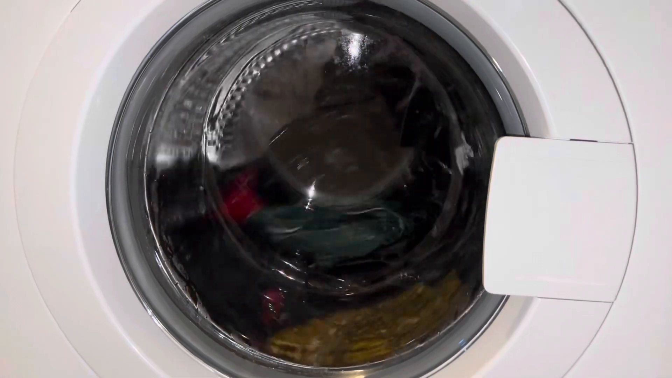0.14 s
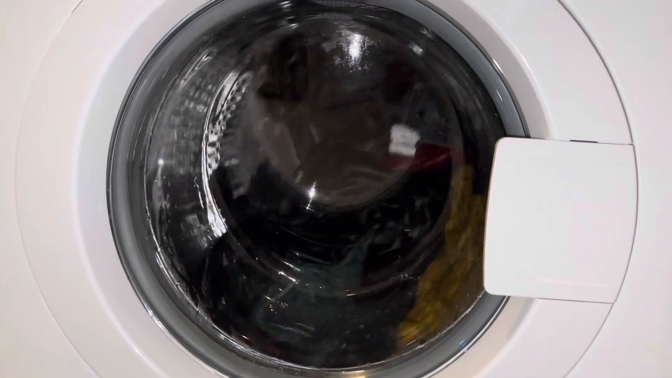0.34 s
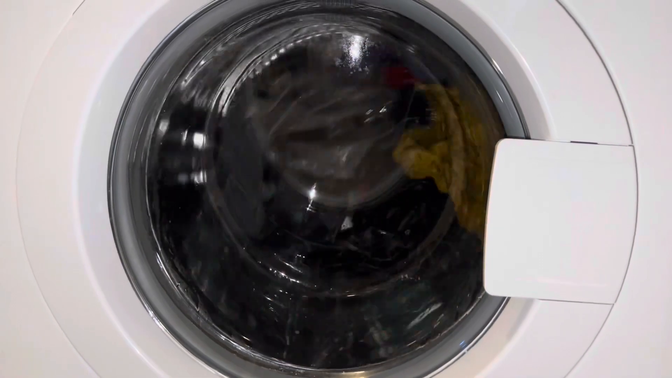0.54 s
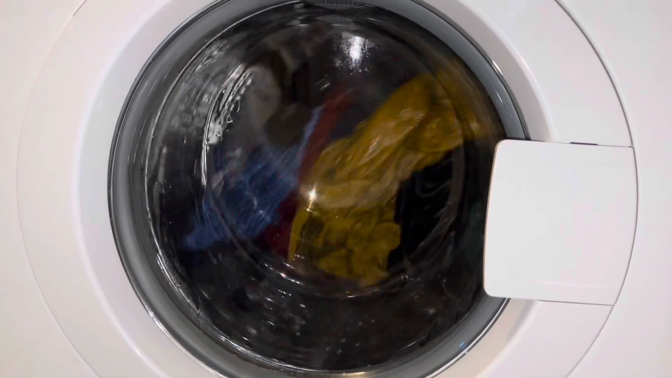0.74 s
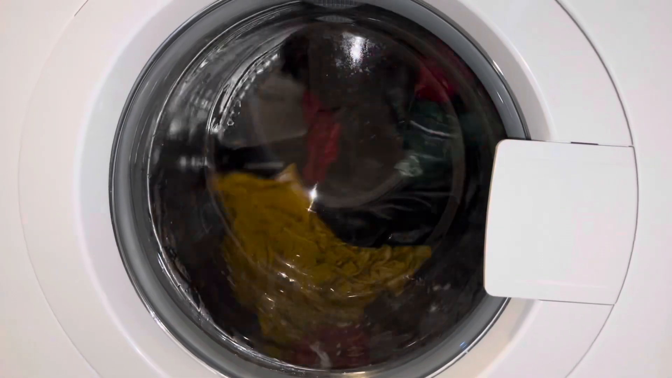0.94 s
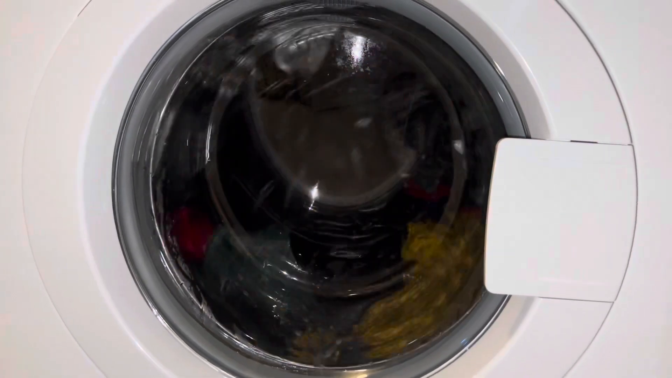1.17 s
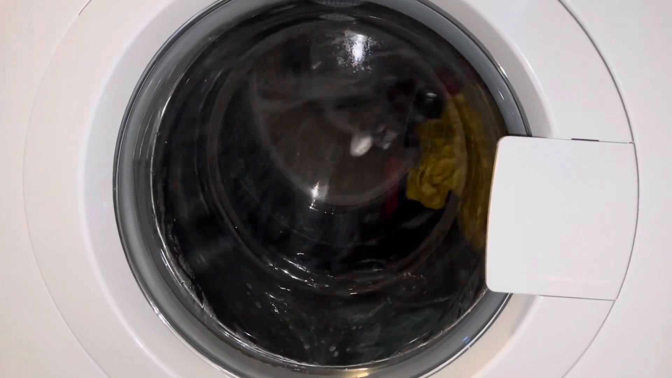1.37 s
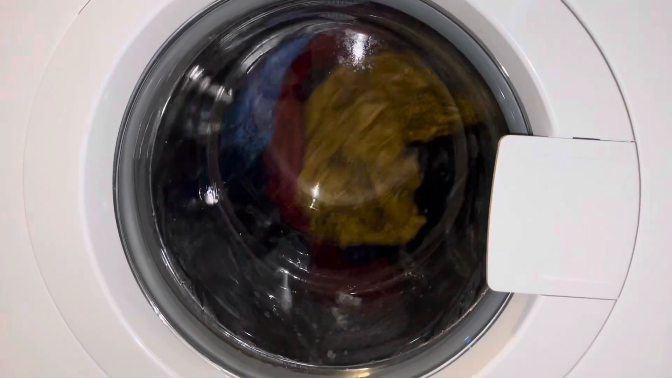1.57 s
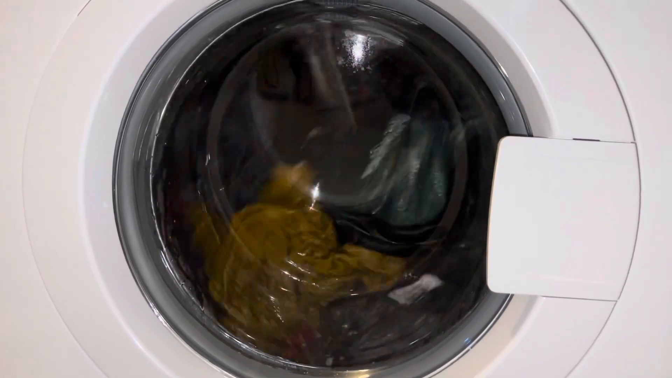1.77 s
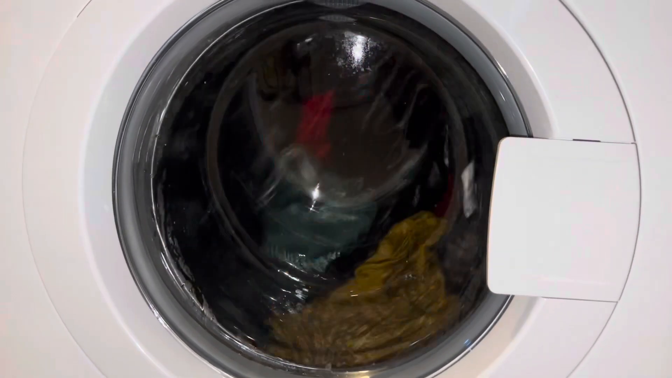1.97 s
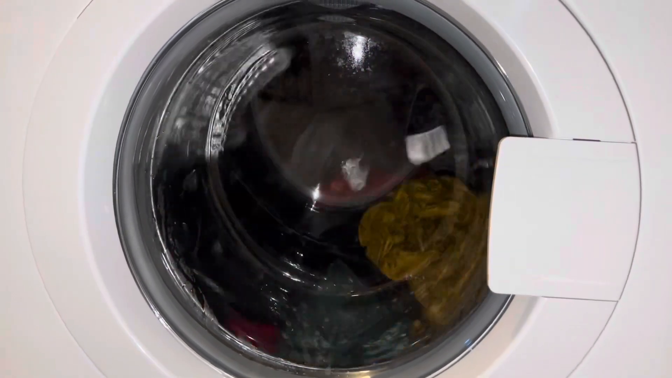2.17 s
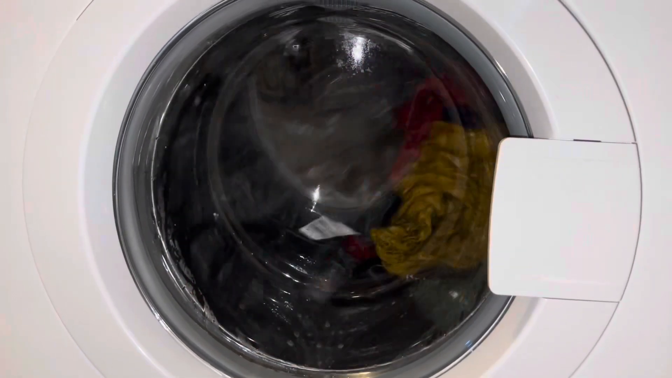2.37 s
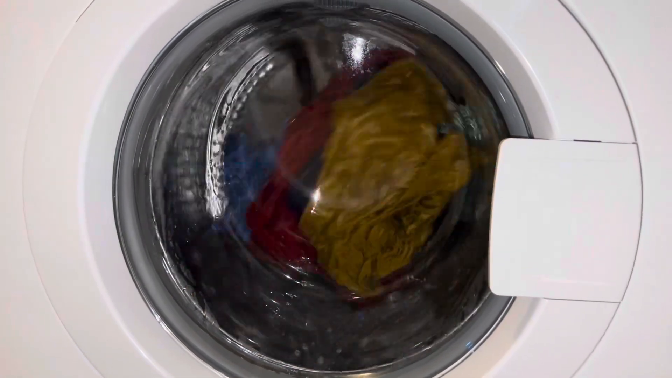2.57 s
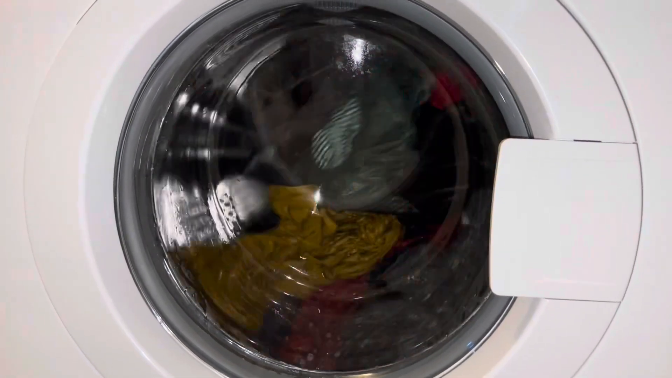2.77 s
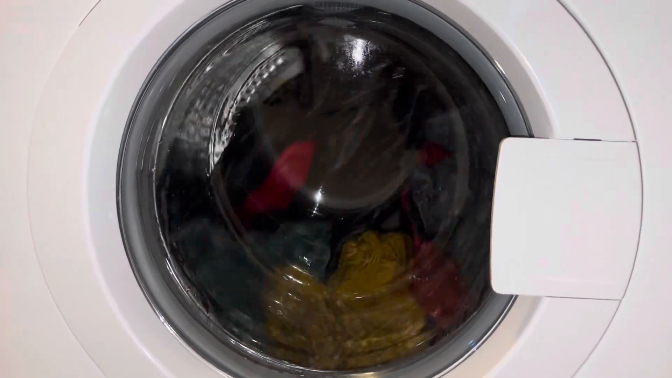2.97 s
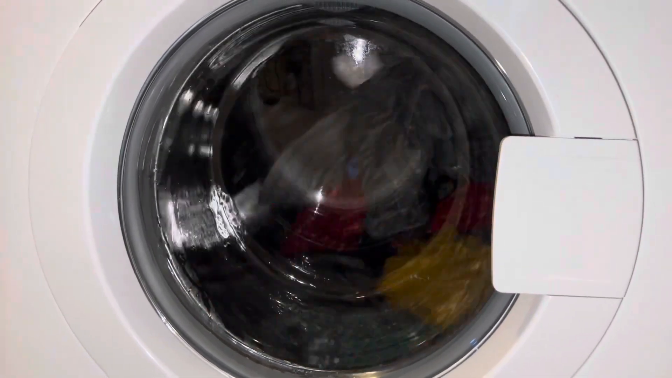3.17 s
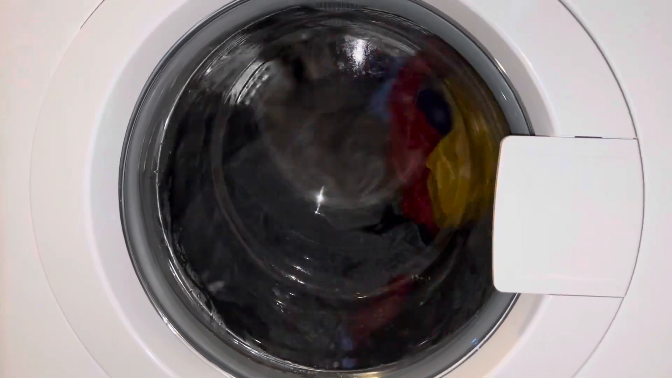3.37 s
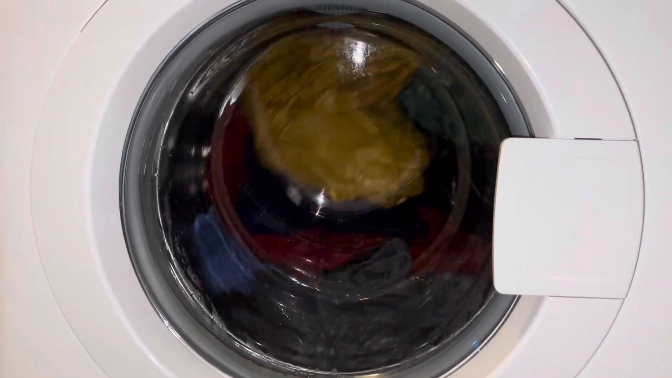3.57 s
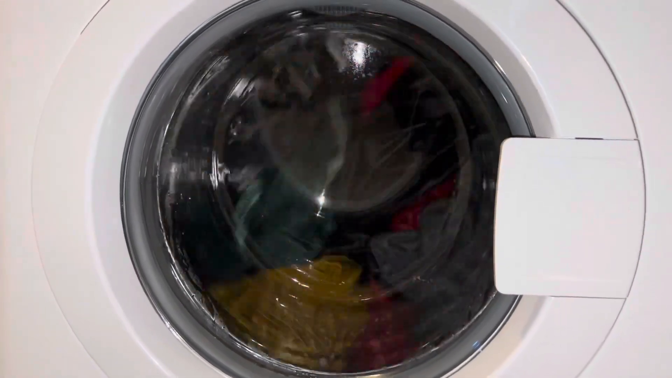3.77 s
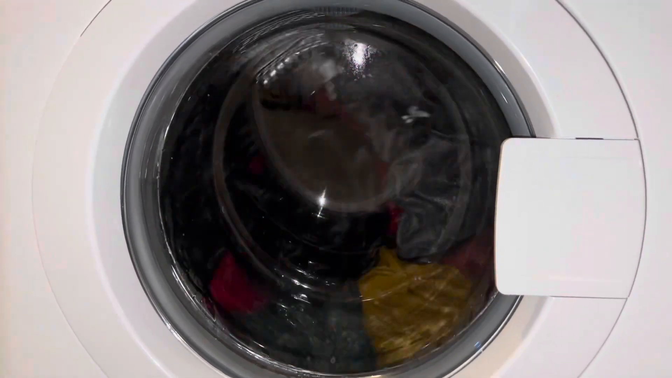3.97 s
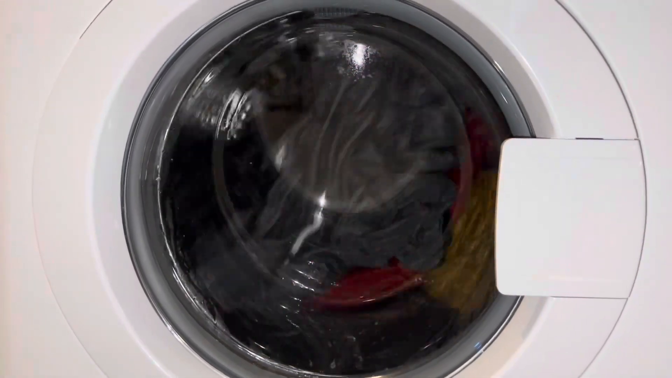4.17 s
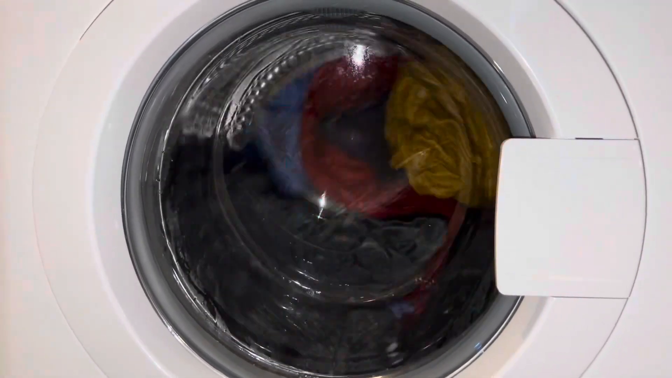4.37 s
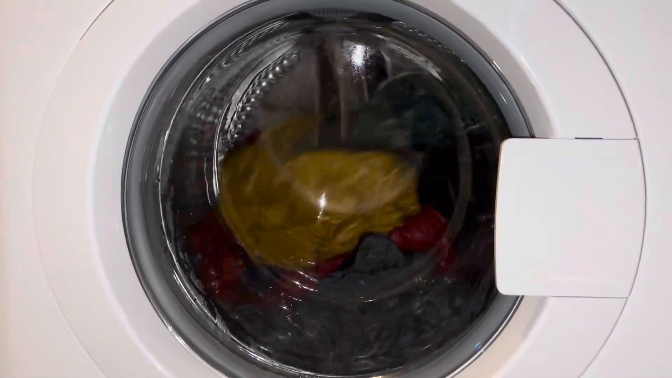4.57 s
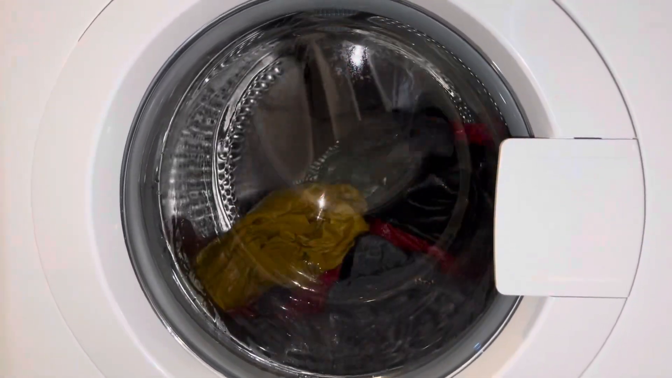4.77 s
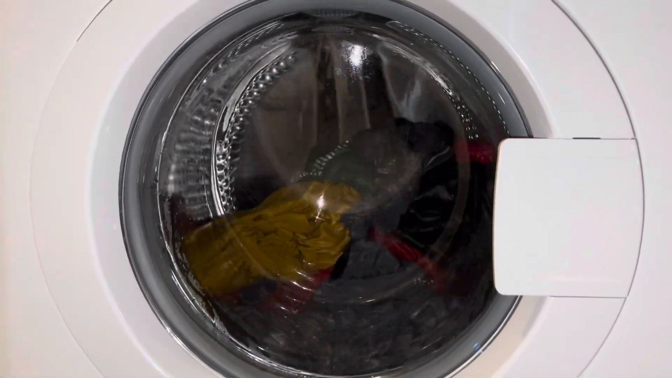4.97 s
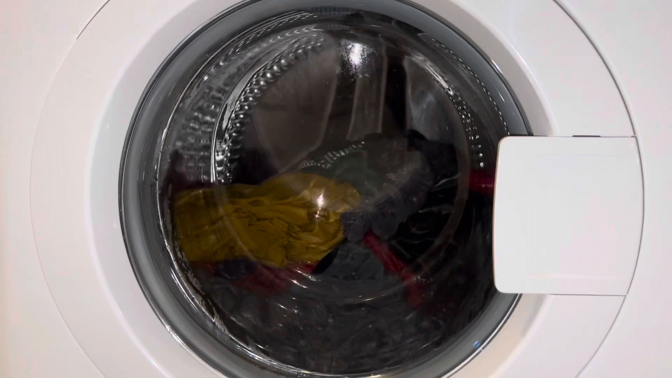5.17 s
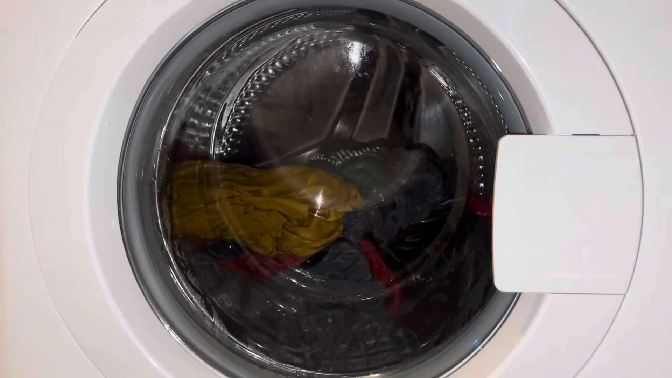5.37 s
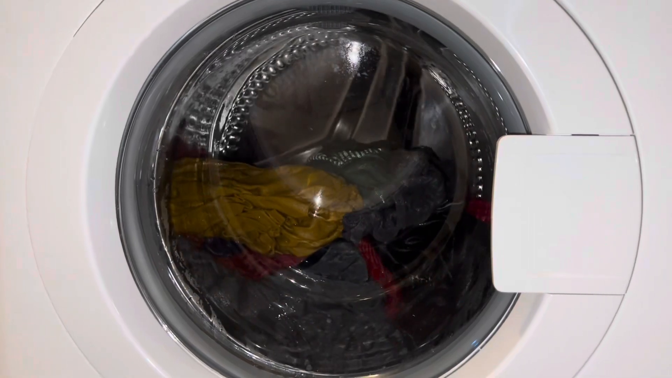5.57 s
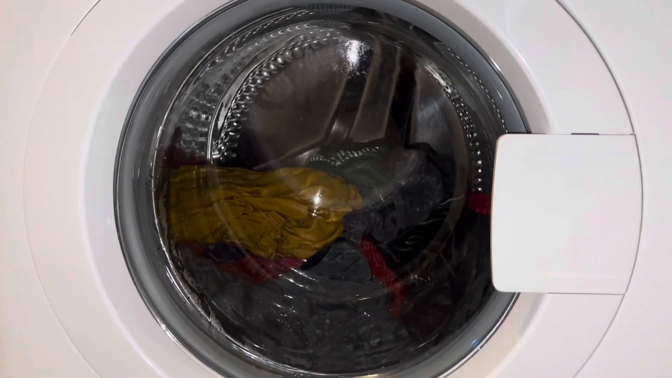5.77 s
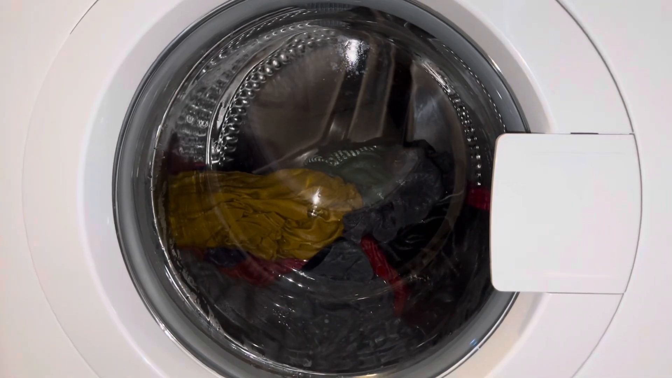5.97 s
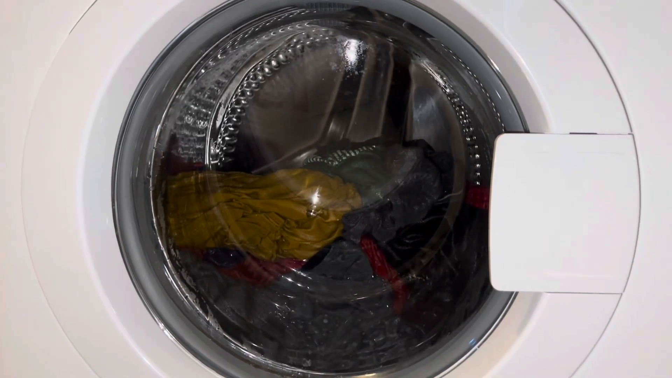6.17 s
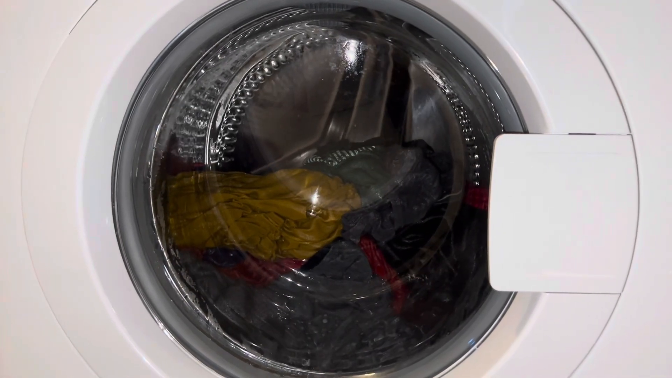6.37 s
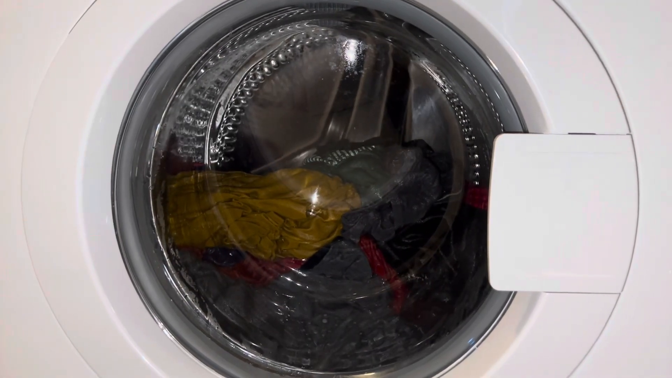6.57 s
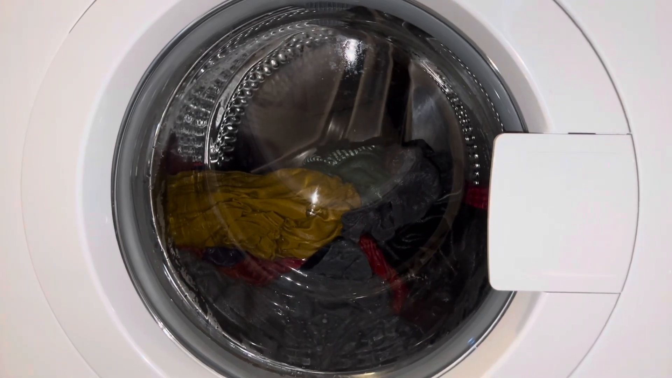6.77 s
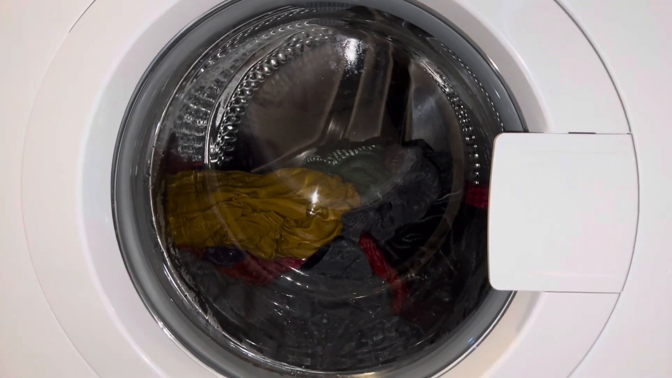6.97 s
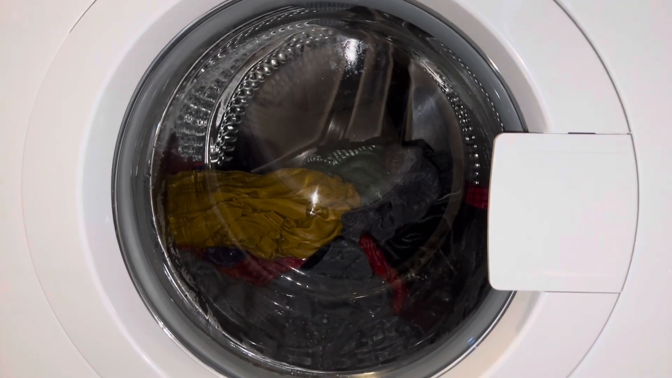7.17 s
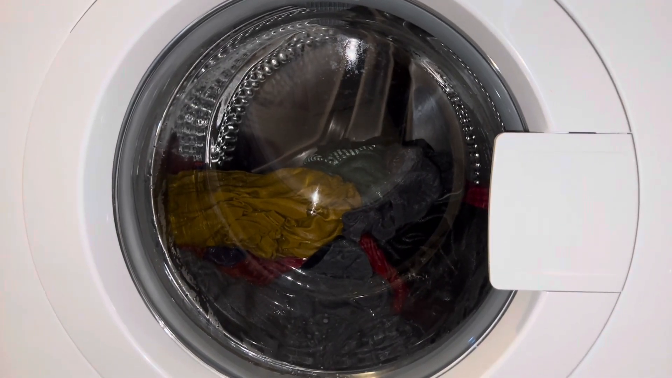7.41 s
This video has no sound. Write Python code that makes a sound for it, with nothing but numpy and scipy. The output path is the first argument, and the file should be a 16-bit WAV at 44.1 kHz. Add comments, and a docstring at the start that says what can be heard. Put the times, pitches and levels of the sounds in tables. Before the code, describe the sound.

Wet clothes tumble and splash in a humming washing machine drum; the motor cuts out, water trickles away, then a relay clacks in near silence.

```python
"""Washing machine coming to rest

A front-loading washing machine tumbles wet laundry in a small hard room.
Magnetic pull makes the mains-fed motor hum, its commutator whines; shaped noise and bubbles slap and slosh.
At 4.35 s the motor cuts out and the load flops to rest; water drains with a hiss and rising gurgles.
A relay then clacks and rings the cabinet panels over a faint steady hiss."""
import sys
import numpy as np
from scipy import signal
from scipy.fft import rfft, irfft, next_fast_len
from scipy.io import wavfile
from scipy.ndimage import uniform_filter1d

SR = 44100
rng = np.random.default_rng(int(sys.argv[2]) if len(sys.argv) > 2 else 0)


def transcribe(signal):
    """Save signal, clipped to [-1, 1], as a 16-bit WAV file at the path in sys.argv[1]."""
    frames = np.atleast_2d(signal).T
    limited = np.clip(frames, -1, 1)
    pcm = np.round(limited * 32767).astype(np.int16)
    wavfile.write(sys.argv[1], SR, pcm)


N = 328104
TIME = np.arange(N) / SR  # s
BUZZ_HZ = 99.93  # twice the mains frequency
MOTOR_OFF_S, DRUM_STOP_S = 4.35, 4.71
CUTOFF_HZ = 15800

# Motor hum under the changing load, before a common gain: start_s, second_line_db [200 Hz], first_line_db [100 Hz]
MOTOR_LOAD = [(0.0, -43, -53), (0.31, -32.5, -40), (0.47, -30.5, -41), (0.53, -34.5, -35),
              (0.94, -33.5, -42), (1.25, -31.5, -42), (1.34, -37, -41.5), (1.57, -35, -41),
              (1.75, -42, -48), (2.4, -34, -40.5), (2.51, -36, -48), (2.56, -39, -45), (3.12, -34, -40.5),
              (3.23, -35.5, -44.5), (3.76, -38, -42), (4.0, -34.5, -42), (4.28, -39, -41.5),
              (4.33, -39.5, -47)]
# Upper hum lines: multiple [of the buzz], level_db [re the 200 Hz line, before a common gain]
UPPER_HUM_LINES = [(3, -14.5), (4, -24.5)]


def hum():
    """Magnetostatic force: the pull at twice the mains shakes the cabinet, harder as the load is lifted."""
    second_db, first_db = in_time(MOTOR_LOAD)
    phase = 2 * np.pi * BUZZ_HZ * TIME
    first = from_db(first_db + 3.5) * np.cos(phase + 0.05 * drift(1.7))
    second = from_db(second_db + 3.5) * np.cos(2 * phase + 0.065 * drift(6.9))
    upper = np.zeros(N)
    for multiple, db in UPPER_HUM_LINES:
        gain = from_db(second_db + db + 2.0 + 2 * drift(5.6))
        upper += gain * np.cos(multiple * phase + 0.14 * drift(5.1))
    running = until(MOTOR_OFF_S + 0.014, 0.012)
    return (first * pan(-0.053) + (second + upper) * pan(-3.5)) * running


def load_swing():
    """Load modulation: how far the 200 Hz line stands above its mean while the motor runs, in dB."""
    load_db, _ = in_time(MOTOR_LOAD)
    return load_db - load_db[TIME < MOTOR_OFF_S].mean()


# Commutator rate, sagging as a bundle is lifted and racing as it drops: start_s, pitch_hz
COMMUTATOR_RATE = [(0, 1815), (0.07, 1740), (0.17, 1722), (0.3, 1761), (0.35, 1690), (0.41, 1730),
                   (0.48, 1703), (0.58, 1802), (0.65, 1737), (0.79, 1820), (0.84, 1743), (0.89, 1813),
                   (0.96, 1757), (1.0, 1795), (1.07, 1745), (1.11, 1714), (1.16, 1705), (1.25, 1770),
                   (1.34, 1760), (1.39, 1720), (1.45, 1672), (1.55, 1814), (1.61, 1840), (1.67, 1860),
                   (1.76, 1780), (1.83, 1808), (1.95, 1714), (2.01, 1800), (2.1, 1730), (2.19, 1804),
                   (2.3, 1690), (2.48, 1845), (2.55, 1870), (2.61, 1788), (2.68, 1835), (2.73, 1788),
                   (2.83, 1742), (2.9, 1662), (3.0, 1654), (3.17, 1869), (3.22, 1730), (3.29, 1765),
                   (3.37, 1685), (3.47, 1667), (3.59, 1714), (3.64, 1688), (3.72, 1825), (3.76, 1763),
                   (3.84, 1700), (4.02, 1813), (4.12, 1772), (4.18, 1827), (4.23, 1816), (4.33, 1892)]
# Commutator tones: multiple [of the rate], level_db, strongest_sideband [order], sideband_loss_db [per order]
COMMUTATOR_TONES = [(1, 0.5, 0.82, 5.5), (1.5, -3, -0.25, 0.35), (2, -6, -0.021, 0)]
WHINE_LEVEL_DB, WHINE_FOLLOWS = -50.5, 0.17  # level at mean load, share of the load's swing
# The brushes' chatter blurs the higher tones: phase spread (rad, by root of multiple - 1), rate (per s)
CHATTER_RAD, CHATTER_PER_S = 1.6, 24
WHINE_WET, WHINE_T60 = .35, .16  # echo inside the cabinet: share, decay in s


def whine(flutter_hz=4, waver_db=2.5):
    """Phase modulation by speed: current pulses put sidebands on each tone, which light up the casing."""
    hz, = in_time(COMMUTATOR_RATE)
    phase = 2 * np.pi * np.cumsum(hz + flutter_hz * drift(13)) / SR
    tones = np.zeros(N)
    for multiple, db, strongest, loss_db in COMMUTATOR_TONES:
        spread_rad = CHATTER_RAD * np.sqrt(max(multiple - 1, 0))
        for order in range(-4, 5):
            gain = from_db(db - loss_db * abs(order - strongest) + waver_db * drift(8))
            chatter = spread_rad * drift(CHATTER_PER_S)
            sideband = 2 * np.pi * (order * BUZZ_HZ * TIME + rng.random())
            tones += gain * np.sin(multiple * phase + chatter + sideband)
    level = from_db(WHINE_LEVEL_DB + WHINE_FOLLOWS * load_swing()) * until(MOTOR_OFF_S, 0.023)
    return level * casing(tones + WHINE_WET * room(tones, WHINE_T60))


def brushes(level_db=-58, pulsing=0.18):
    """Friction noise: the brushes rub in bursts with the current and ring the casing."""
    bursts = white() * (1 + pulsing * np.cos(2 * np.pi * BUZZ_HZ * TIME))
    return from_db(level_db) * casing(bursts) * until(MOTOR_OFF_S, 0.046)


# Motor casing modes, rung by commutator and brushes: pitch_hz, width_hz, level_db
CASING_MODES = [(1716, 28, -6.5), (1813, 34, -0.5), (1861, 19, 5), (1921, 32, 3.5), (2283, 52, -5.5),
                (2519, 32, -0.5), (2680, 20, -8.5), (2893, 13, -4), (2946, 22, -12.5), (3113, 28, -4.5),
                (3278, 27, -2.5), (3430, 50, -7), (3590, 67, -15), (3940, 61, -6.5)]


def casing(x, leak_db=-19):
    """Modal resonance: the casing passes its own modes and little else; rms 1."""
    rings = np.zeros(N)
    for k, (hz, width_hz, db) in enumerate(CASING_MODES):
        rings += (-1) ** k * from_db(db) * resonate(x, hz, width_hz)
    return rms_one(band(rings + from_db(leak_db) * x, 1450, 4300))


# Slosh, surging as the wet load folds over and lulling while it is lifted: start_s, level_db
SLOSH_SURGES = [(0.1, -47.5), (0.2, -39.5), (0.3, -49), (0.39, -41), (0.72, -43.5), (0.78, -40.5),
                (1.05, -45.5), (1.15, -42), (1.62, -42), (1.74, -43.5), (2.04, -44.5), (2.15, -41.5),
                (2.24, -46.5), (2.33, -41.5), (2.56, -44.5), (2.75, -41.5), (2.87, -48), (2.98, -40),
                (3.06, -46.5), (3.14, -39.5), (3.2, -45), (3.33, -43), (3.44, -44), (3.58, -41),
                (3.79, -44.5), (3.88, -42), (4.05, -41.5), (4.16, -47), (4.3, -39.5), (4.42, -43)]
# Spectra of slosh, wet slaps and spray: frequency_hz, density_db [per Hz, relative]
SLOSH_SPECTRUM = [(230, -6), (330, -4), (520, -5.5), (700, -10), (1050, -11.5), (1500, -12), (2100, -14),
                  (3300, -27), (4500, -33.5)]
SLAP_SPECTRUM = [(150, -43), (300, 0.5), (1000, -4.5), (1450, -3.5), (2100, -15.5), (4000, -16)]
SPRAY_SPECTRUM = [(2000, 9), (3200, 1.5), (5000, 0), (7000, -2.5), (8500, 3.5), (9500, -7), (10500, -15.5),
                  (15800, -18.5)]
SPRAY_DB = -58  # mean level of the steady spray under power
# Wet clothes landing, levels before the gains of each layer:
# start_s, peak_db, thud_db [re peak], pitch_hz [trapped air], pocket_db [re peak]
LANDINGS = [(0.18, -33.5, 5.5, 845, -4), (0.395, -38.5, -12, 1131, -12.5), (0.63, -35.5, 2, 1000, -9),
            (0.891, -36.5, -13, 753, -7), (1.162, -33, -19, 1038, -7), (1.342, -31.5, -18, 471, -8),
            (1.424, -37, -4, 318.4, -5.5), (1.484, -45, -18, 1559, -0.5), (1.608, -33, -17, 553, -12.5),
            (1.668, -32, -3, 1315, -20), (1.79, -32, -18, 1030, -10), (2.388, -32.5, 8, 517, -20),
            (2.629, -31.5, -5, 1048, -9.5), (2.728, -39, 1, 950, -3), (2.757, -27, -5, 430, -9),
            (3.575, -41, -13, 779, -12), (3.685, -31, -12, 555, -11.5), (4.277, -41, -9, 540, -2),
            (4.318, -34.5, -18, 1530, -12.5), (4.38, -46, -15, 1280, -4.5), (4.477, -39, 1, 1040, -12),
            (4.568, -35, -6, 690, -12), (4.654, -31.5, -22, 1040, -12.5)]


def wash_load():
    """Impact and bubble noise: water sloshes; each landing adds a thud, a wet slap and a burst of spray."""
    s, peak_db, thud_db, _, _ = np.transpose(LANDINGS)

    slosh_db, = in_time(SLOSH_SURGES)
    froth = bubbles(per_s=1100, spread_db=2.8, cycles=18, low_hz=250, high_hz=2400)
    churned = churn(patchy_db=2.5, rate=10) + .5 * (froth + room(froth, t60=0.2))
    water = from_db(slosh_db) * colour(in_drum(churned), SLOSH_SPECTRUM)

    squelch_bubbles = bubbles(per_s=1600, spread_db=3.0, cycles=12.5, low_hz=293.0, high_hz=2215, count=14)
    squelch = white() + 0.41 * squelch_bubbles
    landing = swells(s - .013, peak_db - 8.0, rise_s=0.017, t60=0.14)
    slaps = landing * even(colour(in_drum(squelch), SLAP_SPECTRUM), span_s=0.018) + pockets()

    thud_swells = swells(s - .004, peak_db + thud_db - 10.0, rise_s=0.0068, t60=0.079)
    thuds = thud_swells * rms_one(band(white(), 180, 420))

    # negative spread: the rarer draws are the weaker bubbles
    fine_bubbles = bubbles(per_s=1500, spread_db=-1.5, cycles=5.9, low_hz=3240, high_hz=14200, count=10)
    fizz = white() + 0.48 * fine_bubbles
    wet = agitation(follows=0.67) * until(DRUM_STOP_S, 0.04)
    spray_level = from_db(SPRAY_DB + 0.86 * drift(8)) * wet + from_db(-24.5) * landing
    spray = spray_level * colour(fizz, SPRAY_SPECTRUM)
    return ears(water * agitation() + slaps + thuds) * pan(-0.004) + ears(spray) * pan(0.79)


# Air pocket: width as a share of its pitch, build-up in s, decay in s
POCKET_WIDTH, POCKET_RISE_S, POCKET_T60 = 0.077, 0.0099, 0.17


def pockets():
    """Cavity resonance: air squeezed out by each bundle gives its splash a rounded note."""
    out, age = np.zeros(N), np.arange(SR // 4) / SR
    shape = (1 - np.exp(-age / POCKET_RISE_S)) * from_db(-60 * age / POCKET_T60)
    for s, peak_db, _, hz, db in LANDINGS:
        noise = rng.standard_normal(len(age))
        note = resonate(resonate(noise, hz, POCKET_WIDTH * hz), hz, hz)
        add(out, s - .006, from_db(peak_db + db) * shape / shape.max() * even(note, span_s=0.032))
    return out


# Air modes of the drum: pitch_hz, width_hz, level_db [before the hollow share]
DRUM_MODES = [(384, 23, -11.5), (513, 24, 2), (576, 49, 1), (775, 39, 3), (903, 41, 3), (1048, 80, 4),
              (1300, 13, -10)]


def in_drum(x, hollow=0.84):
    """Cavity modes: the drum's air resonances make the water sound hollow."""
    return x + hollow * sum(from_db(db) * resonate(x, hz, width_hz) for hz, width_hz, db in DRUM_MODES)


COAST_LOSS_DB, SETTLE_DB_PER_S = 7, 117  # drop while coasting, decay once at rest; scaled by follows


def agitation(follows=1):
    """Driven excitation: full under power, lower while the drum coasts, dying once it rests."""
    coast = 1 - until(MOTOR_OFF_S + 0.017, 0.059)
    rest_s = np.maximum(TIME - DRUM_STOP_S, 0)
    return from_db(-follows * (COAST_LOSS_DB * coast + SETTLE_DB_PER_S * rest_s))


# Buttons and zips tapping the drum: start_s, ring_db [before a common lift], pitch_hz, tick_db
DRUM_TAPS = [(0.535, -45, 2550, -60), (1.237, -47, 2663, -56.5), (1.656, -49.5, 4450, -73),
             (2.91, -68, 3290, -52), (3.399, -52.5, 4970, -75), (3.957, -59, 2820, -50),
             (4.559, -64, 4000, -57)]


def taps(ring_db=3, ring_t60=0.1, tick_t60=.075):
    """Impact excitation: hard bits of clothing chatter on steel with a short ring and a bright tick."""
    out, age = np.zeros(N), np.arange(SR // 5) / SR
    for s, db, hz, _ in DRUM_TAPS:
        chatter = rng.standard_normal(len(age)) ** 3  # cubing makes it spiky
        ring = even(resonate(resonate(chatter, hz, hz / 6), hz, hz / 2), span_s=.02)
        add(out, s, from_db(db + ring_db - 60 * age / ring_t60) * ring)
    s, _, _, tick_db = np.transpose(DRUM_TAPS)
    ticks = swells(s, tick_db, rise_s=0.0024, t60=tick_t60)
    return out + ticks * rms_one(band(white(), 3800, 8900))


# Bundles bumping the tub, and later sagging against it: start_s, level_db [before the rock and boom gains]
TUB_BUMPS = [(0.19, -47), (0.56, -44), (1.28, -45), (1.38, -52), (1.8, -44), (2.37, -50), (3.081, -45.5),
             (4.82, -63), (5.98, -77), (7.36, -73)]
# Rumble of the turning tub: frequency_hz, density_db [per Hz, relative]
TUB_SPECTRUM = [(32, -7), (45, -8), (62, 1.5), (85, -4), (135, -6), (170, -3), (230, 0), (400, -32.5)]
RUMBLE_DB = -46  # mean level under power


def tub(rock_db=1.5, boom_db=2):
    """Mass on springs: the tub rumbles as it turns; a heavy bundle makes it boom and rock harder."""
    s, db = np.transpose(TUB_BUMPS)
    turning = from_db(RUMBLE_DB + drift(2.84)) * agitation(follows=0.71) * colour(white(), TUB_SPECTRUM)
    rocking = swells(s, db + rock_db, rise_s=0.025, t60=0.27) * rms_one(band(white(), 35, 76))
    boom_spectrum = [(60, -17.0), (115, 5.5), (160, -20.0), (240, -1.0)]
    boom = swells(s, db + boom_db, rise_s=0.02, t60=0.21) * colour(white(), boom_spectrum)
    return turning + rocking + boom


# Draining water: frequency_hz, density_db [per Hz, relative]
DRAIN_SPECTRUM = [(1500, 4.5), (3200, 3.5), (6500, 5), (9000, -8), (16000, -34)]
# Air gulping in the sump: start_s, level_db [before the gulp gain], pitch_hz [at the start]
SUMP_GULPS = [(5.22, -52.5, 825), (5.244, -56, 916), (5.263, -53, 400), (5.283, -46.5, 220),
              (5.284, -57, 630), (5.308, -53, 268)]
GULP_S = 0.004  # a gulp swells for this long, then fades


def draining(trickle_db=-69, gulp_db=4):
    """Bubble resonance: water leaves the load with a fine hiss; bubbles rise in pitch as they gulp."""
    trickle = colour(white(), DRAIN_SPECTRUM) * (1 - until(4.84, 0.19)) * until(5.39, 0.17)
    gulps, age = np.zeros(N), np.arange(SR // 6) / SR
    swell = age / GULP_S * np.exp(-age / GULP_S)
    for s, db, hz in SUMP_GULPS:
        rising = np.sin(2 * np.pi * hz * age * (1 + 2 * age))
        add(gulps, s, from_db(db + gulp_db) * rising * swell)
    froth = bubbles(per_s=370, spread_db=-7.0, cycles=13, low_hz=280, high_hz=990, count=10)
    gulps += swells([5.24], [-65], rise_s=0.036, t60=0.33) * froth
    return from_db(trickle_db) * trickle + gulps + room(gulps, t60=0.53)


# The relay's armature lands and bounces: start_s, level_db
RELAY_BOUNCES = [(6.444, -44.5), (6.451, -60), (6.463, -62)]
# Relay snap: frequency_hz, density_db [per Hz, relative]
CLACK_SPECTRUM = [(59, -36), (100, -3), (775, -7), (1620, -7), (2080, -11), (3100, -9), (3740, -19),
                  (4610, -9), (7840, -14), (8330, -6), (8750, 1), (9400, -40), (12100, -45)]
# Cabinet panels rattled by the relay: pitch_hz, width_hz, level_db [re the ring level]
PANEL_MODES = [(457, 60, -10), (780, 40, -6), (1130, 140, -7), (1640, 93, -4), (2940, 230, -2.5),
               (4600, 240, -3), (5740, 220, -5)]


def relay(ring_db=-52, ring_t60=0.37, damping=0.11):
    """Modal damping: a bouncing relay rings panels whose high modes die first; the room holds the lows."""
    s, db = np.transpose(RELAY_BOUNCES)
    rattle = colour(white() * white(), CLACK_SPECTRUM)  # a product of noises is spiky
    snap = swells(s, db, rise_s=0.0027, t60=0.18) * even(rattle, span_s=0.014)
    edge = swells(s, db - 8.5, rise_s=0.0019, t60=0.14) * rms_one(band(white(), 11200, CUTOFF_HZ))
    ring = np.zeros(N)
    for hz, width_hz, mode_db in PANEL_MODES:
        mode_t60 = ring_t60 * (hz / PANEL_MODES[0][0]) ** -damping
        mode = even(resonate(resonate(white(), hz, width_hz), hz, hz / 2), span_s=.02)
        ring += swells(s[:1], [ring_db + mode_db], rise_s=0.0052, t60=mode_t60) * mode
    tail = swells(s[:1], [-58], rise_s=0.019, t60=0.47) * rms_one(band(rattle, 125, 930))
    return snap + edge + ring + tail


# Spectra of low room noise and of the hiss: frequency_hz, density_db [per Hz, relative]
QUIET_SPECTRUM = [(28, -25), (60, -3.5), (78, -7), (100, -1.5), (140, -12.5), (420, -11.5), (700, -17),
                  (1200, -19)]
HISS_SPECTRUM = [(600, -24), (1100, -8), (1450, -11), (1630, 2), (1880, -1), (2100, -4.5), (2400, -8.5),
                 (3000, -24.5), (4500, -25.5), (5700, -18), (7400, -18.5), (8200, -27.5), (15000, -59)]


def background(low_db=-71, hiss_db=-71):
    """Stationary noise: low room noise, and a steady narrow hiss from the left."""
    low = from_db(low_db) * ears(colour(white(), QUIET_SPECTRUM))
    hiss = from_db(hiss_db) * ears(colour(white(), HISS_SPECTRUM)) * pan(11.0)
    return low + hiss


# Likeness of the two sides: frequency_hz, likeness [correlation, 0 to 1]
SIDE_LIKENESS = [(60, 1), (150, 0.79), (280, 0.87), (550, 0.66), (1100, 0.09), (2200, 0.04), (4500, 0.31),
                 (9000, 0.11)]


def ears(x, t60=0.069):
    """Interaural coherence: early wall reflections make the sides differ, hardly at all in the bass."""
    size = next_fast_len(N, True)
    hz = np.arange(size // 2 + 1) * SR / size
    alike = np.clip(at_hz(SIDE_LIKENESS, hz), -1, 1)
    mid = np.sqrt((1 + alike) / 2) * rfft(x, size)
    side = np.sqrt((1 - alike) / 2) * rfft(room(x, t60), size)
    return irfft([mid + side, mid - side], size)[:, :N]


def room(x, t60):
    """Diffuse reverberation: the tail that hard walls add, as strong as the sound itself."""
    age = np.arange(SR // 2) / SR
    tail = rng.standard_normal(len(age)) * from_db(-60 * age / t60)
    return signal.fftconvolve(x, tail / np.linalg.norm(tail))[:N]


def bubbles(per_s, spread_db, cycles, low_hz, high_hz, count=20):
    """Bubble resonance: random bubbles of uneven strength ring for a few cycles each; rms 1."""
    out = np.zeros(N)
    for hz in np.geomspace(low_hz, high_hz, count):
        when, size, chance, sign = rng.random((1500, 4)).T
        born = chance < per_s * N / SR / count / len(chance)
        strength = from_db(spread_db * np.minimum(-np.log(size), 4))
        clicks = np.full(N, 1e-18)
        clicks[(when * N).astype(int)] = strength * np.sign(sign - .5) * born
        out += resonate(clicks, hz, 2 * hz / cycles)
    return rms_one(out)


def churn(patchy_db, rate, count=11):
    """Turbulent noise: bands of about half an octave swell and sink each on its own; rms 1."""
    noises, edges = [white(), white()], np.geomspace(180, 5600, count + 1)
    out = np.zeros(N)
    for k in range(count):
        patch = from_db(patchy_db * drift(rate))
        out += band(noises[k % 2], edges[k], edges[k + 1]) * patch  # neighbours use different noises
    return rms_one(out)


def swells(times, levels_db, rise_s, t60):
    """Energy addition: blows build up quickly and die away, and their powers add in the envelope."""
    power, age = np.zeros(N), np.arange(SR // 2) / SR
    shape = (1 - np.exp(-age / rise_s)) * from_db(-60 * age / t60)
    for s, db in zip(times, levels_db):
        add(power, s, (from_db(db) * shape / shape.max()) ** 2)
    return np.sqrt(power)


def resonate(x, hz, width_hz):
    """Simple resonator: two poles, with gain 1 on top."""
    r = np.exp(-np.pi * width_hz / SR)
    zeros = np.array([1, 0, -1]) * (1 - r * r) / 2
    poles = [1, -2 * r * np.cos(2 * np.pi * hz / SR), r * r]
    return signal.lfilter(zeros, poles, x)


def colour(x, spectrum):
    """Spectral shaping: weight by a spectrum that falls away steeply beyond its ends; rms 1."""
    size = next_fast_len(N, True)
    hz = np.arange(size // 2 + 1) * SR / size
    outside = np.clip(hz / spectrum[0][0], 0, 1) * np.clip(spectrum[-1][0] / (hz + 1), 0, 1)
    shaped = rfft(x, size) * from_db(at_hz(spectrum, hz)) * outside ** 4
    return rms_one(irfft(shaped, size)[:N])


def band(x, low_hz, high_hz):
    """Band limiting: a Butterworth band-pass."""
    sos = signal.butter(2, [low_hz, min(high_hz, .45 * SR)], "band", fs=SR, output="sos")
    return signal.sosfilt(sos, x)


def white():
    """White noise: equal power at every frequency."""
    return rng.standard_normal(N)


def drift(rate):
    """Random fluctuation: normal values, twice the rate per second, joined by lines; rms 1."""
    knots = rng.standard_normal(N // 40)
    return rms_one(np.interp(TIME * rate * 2, np.arange(len(knots)), knots))


def even(x, span_s):
    """Power normalisation: hold a noise at unit power over a short span, keeping its fine grain."""
    return x / np.sqrt(np.abs(uniform_filter1d(x ** 2, int(span_s * SR))) + 1e-12)


def rms_one(x):
    """Power normalisation: scale to unit mean power."""
    return x / np.sqrt(np.mean(x ** 2) + 1e-20)


def until(end_s, fade_s):
    """Smooth gating: one, falling to zero around the given time."""
    return .5 - .5 * np.tanh((TIME - end_s) / fade_s)


def in_time(rows):
    """Linear interpolation: one curve in time per column."""
    s, *columns = np.transpose(rows)
    return [np.interp(TIME, s, c) for c in columns]


def at_hz(points, hz):
    """Logarithmic pitch scale: read a spectrum on a log-frequency axis."""
    f, value = np.transpose(points)
    return np.interp(np.log(hz + 1e-3), np.log(f), value)


def from_db(db):
    """Level law: decibels to amplitude gain."""
    return 10 ** (np.asarray(db) / 20)


def pan(db):
    """Level difference between the sides: gains for left minus right in dB."""
    return from_db(np.array([[db], [-db]]) / 2)


def add(out, s, sound):
    """Superposition: mix a short sound in at a time."""
    part = out[..., max(round(s * SR), 0):][..., :sound.shape[-1]]
    part += sound[..., :part.shape[-1]]


def scene():
    """Superposition of sources: the motor sits a little to the right, the tub nearly straight ahead."""
    motor = hum() + ears(whine() + brushes()) * pan(-3.0)
    machine = ears(taps() + tub() + draining() + relay()) * pan(-1.0)
    return motor + wash_load() + machine + background()


def record(dry):
    """Band limiting: an elliptic low-pass cuts the top steeply."""
    return signal.sosfilt(signal.ellip(10, .1, 80, CUTOFF_HZ, fs=SR, output="sos"), dry)


dry = scene()
out = record(dry)
transcribe(out)
```